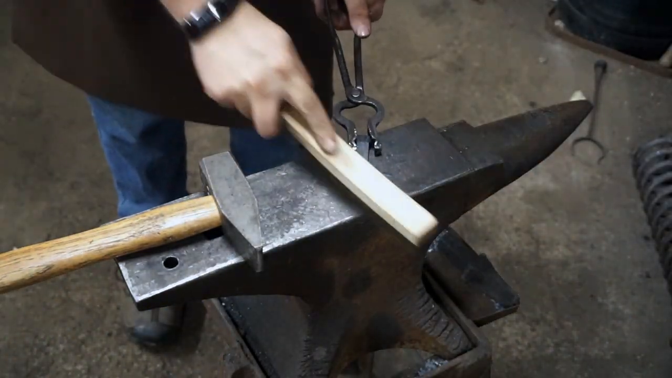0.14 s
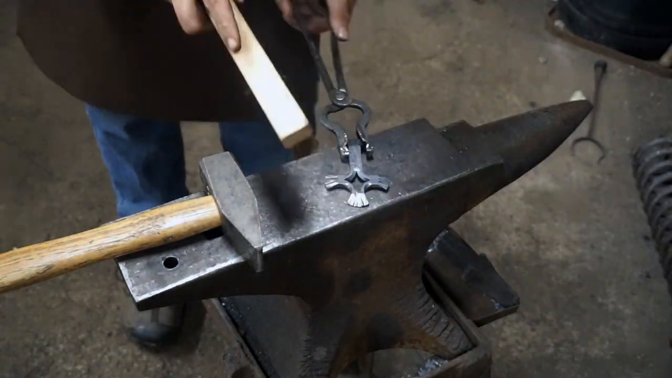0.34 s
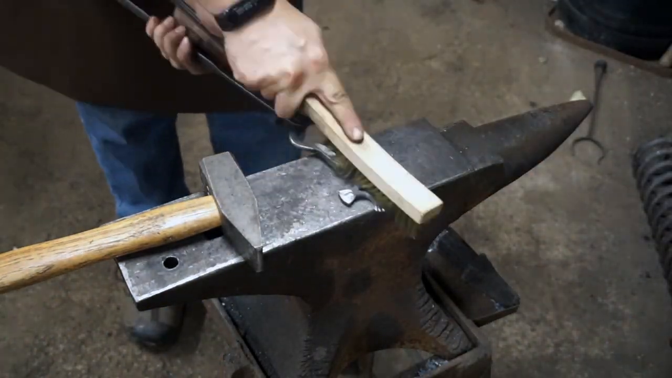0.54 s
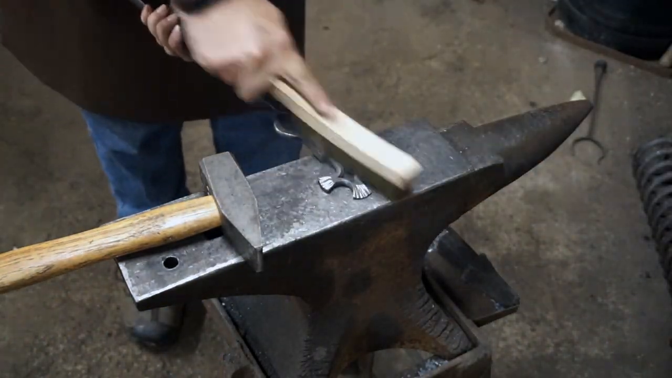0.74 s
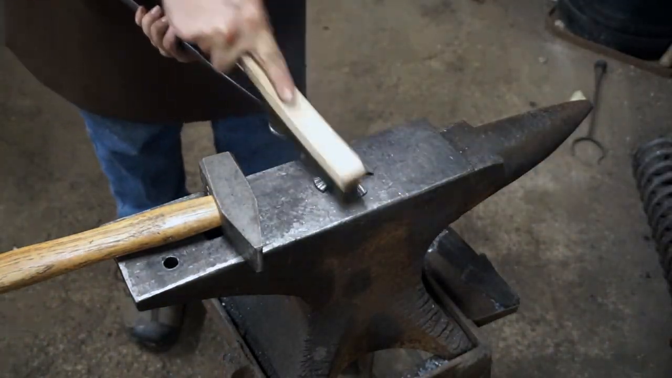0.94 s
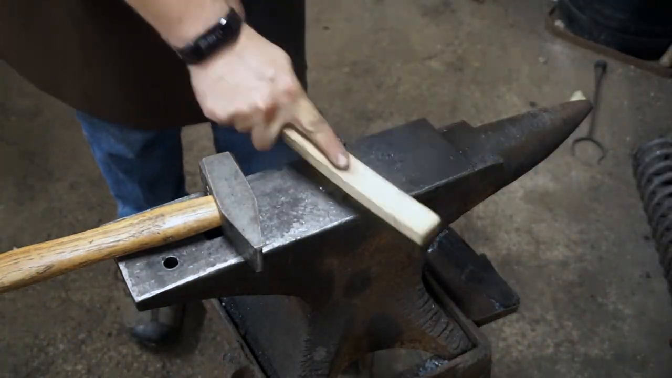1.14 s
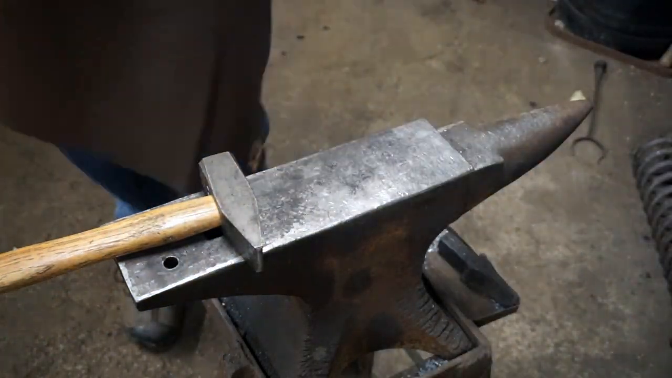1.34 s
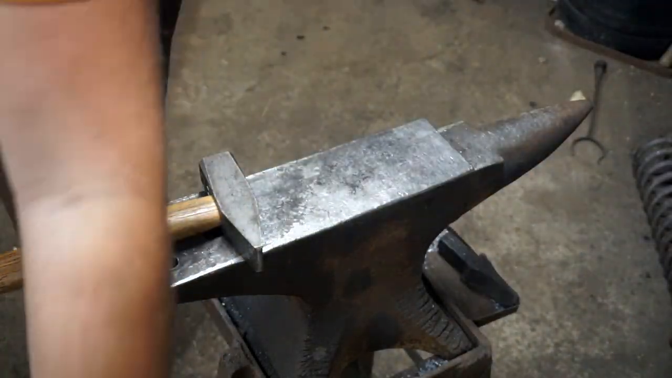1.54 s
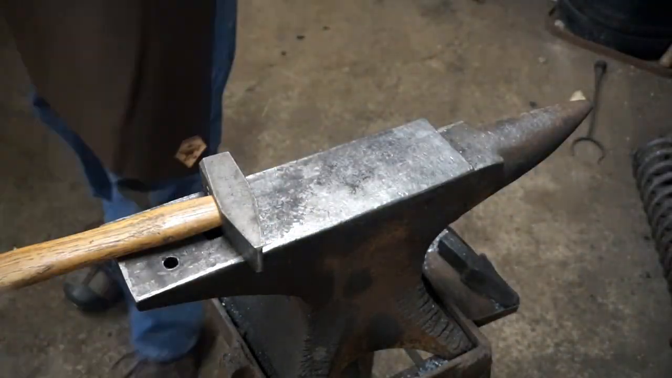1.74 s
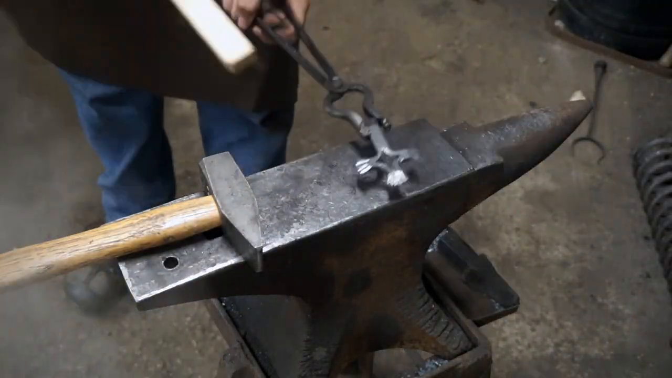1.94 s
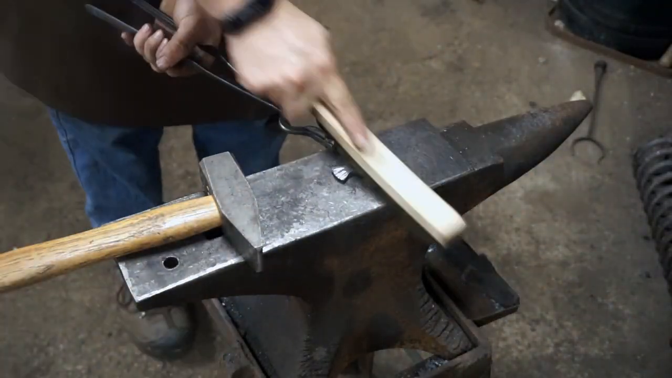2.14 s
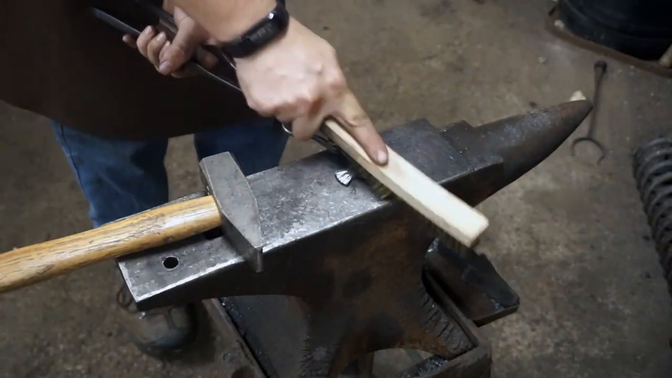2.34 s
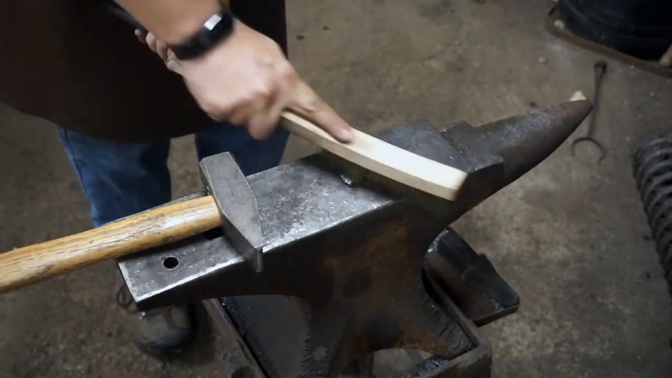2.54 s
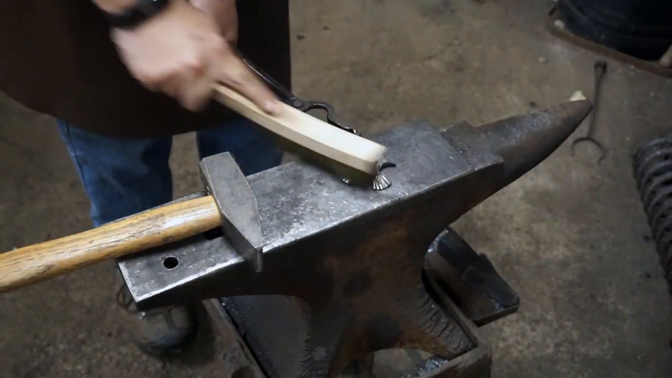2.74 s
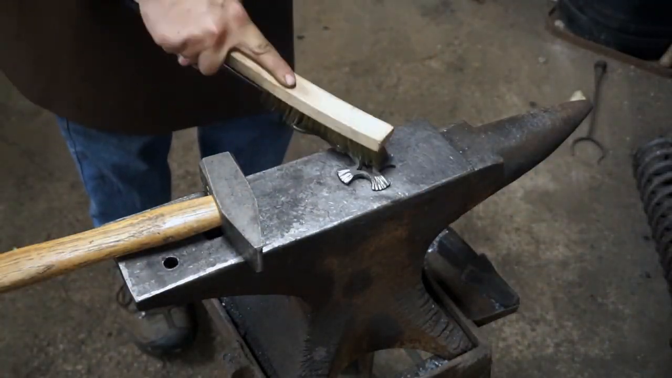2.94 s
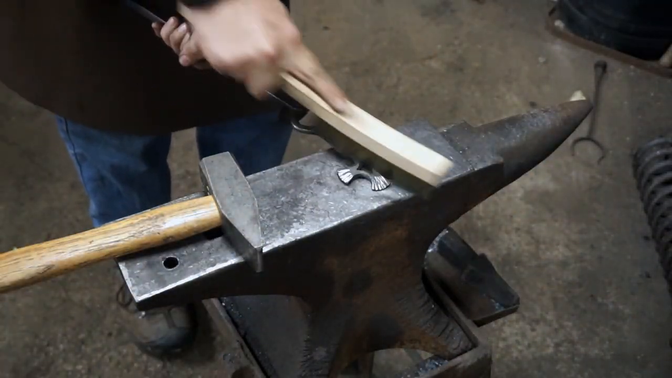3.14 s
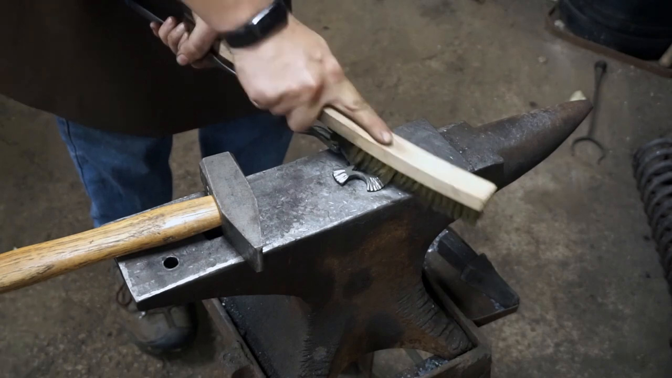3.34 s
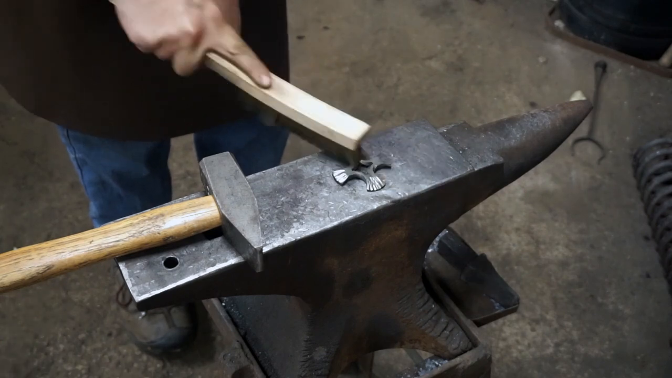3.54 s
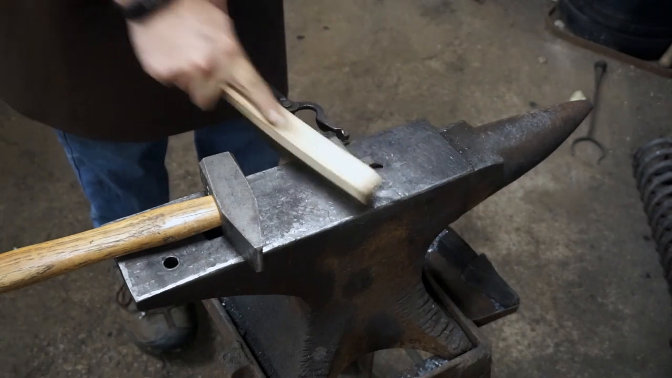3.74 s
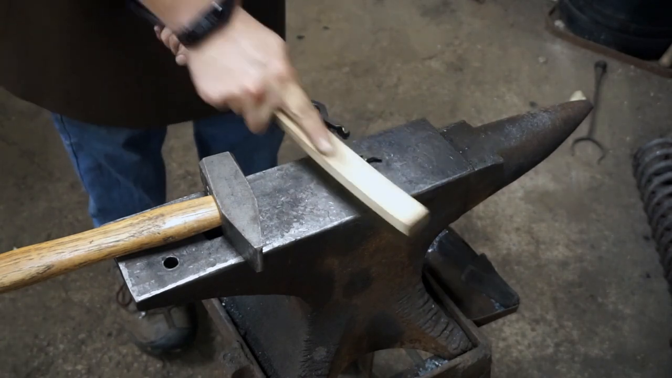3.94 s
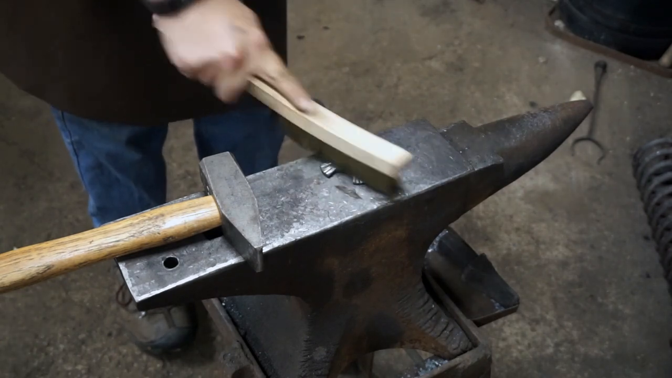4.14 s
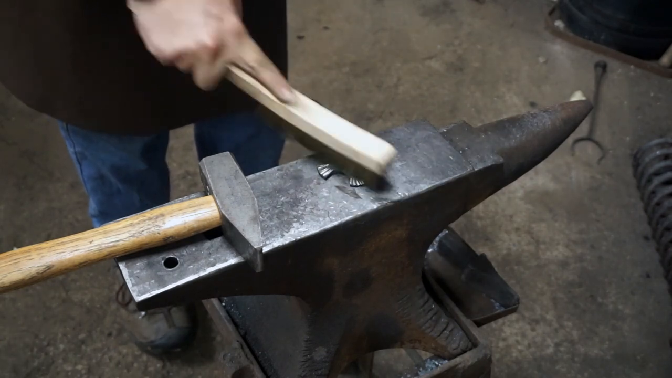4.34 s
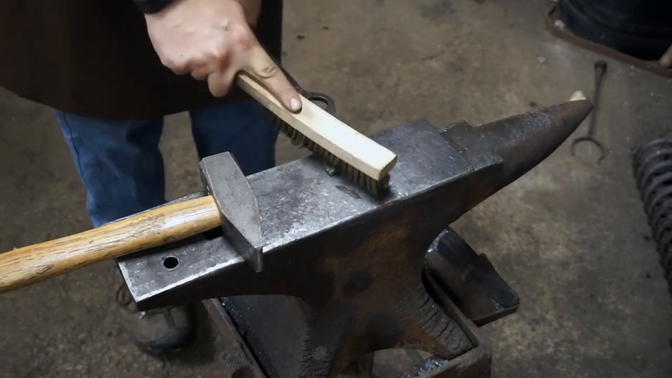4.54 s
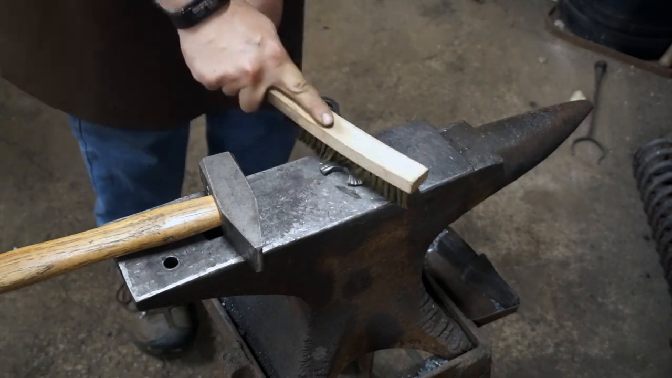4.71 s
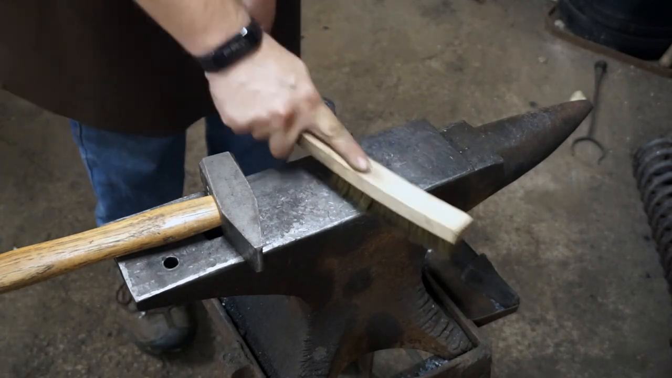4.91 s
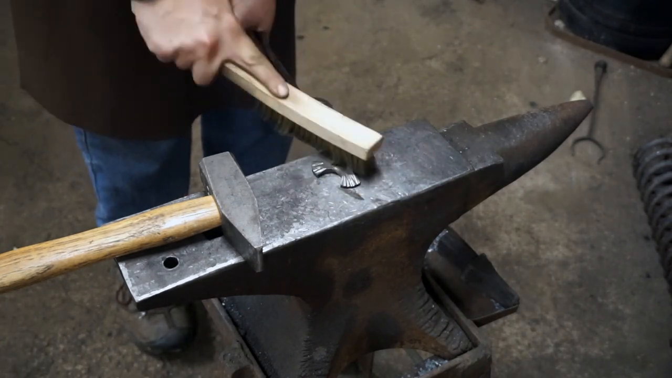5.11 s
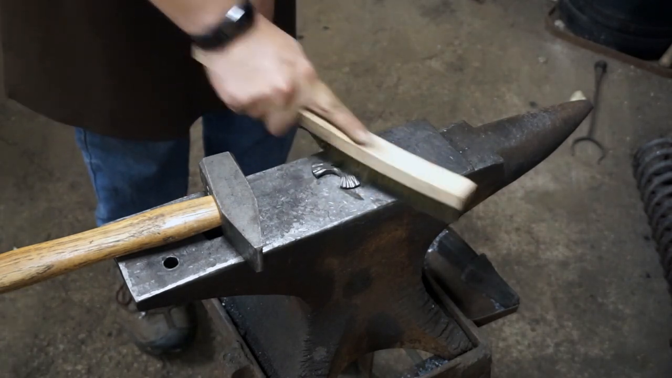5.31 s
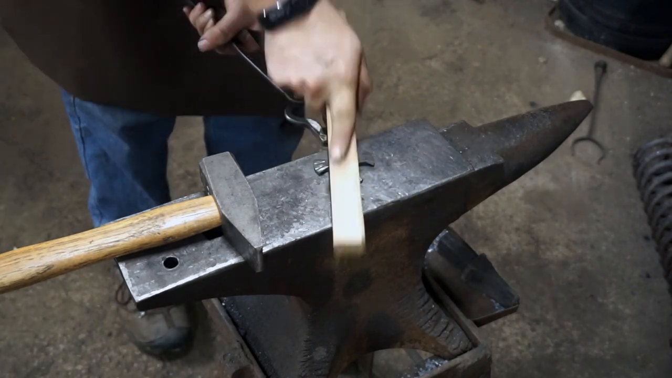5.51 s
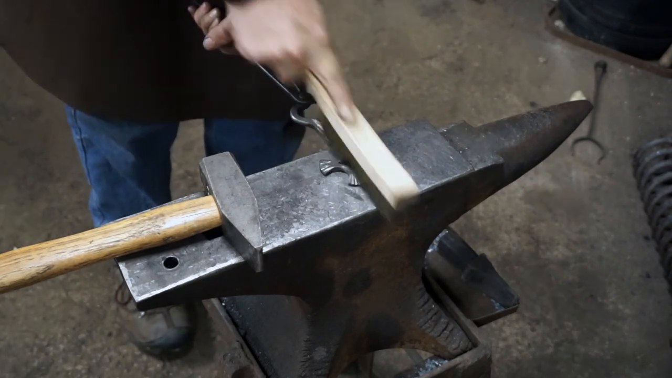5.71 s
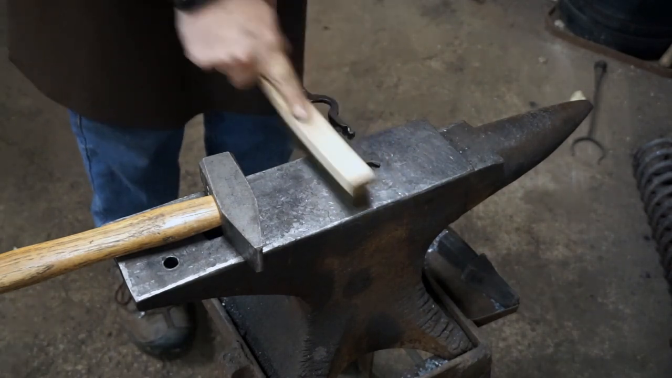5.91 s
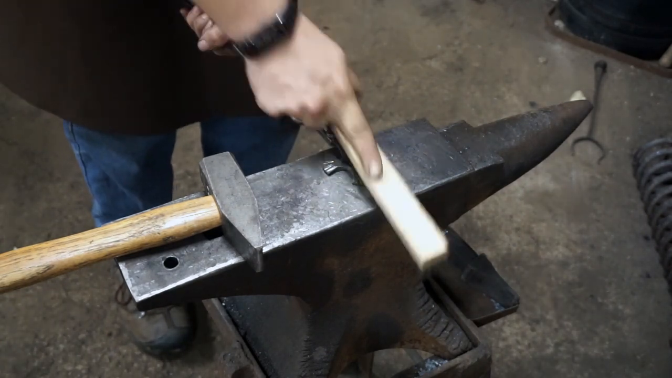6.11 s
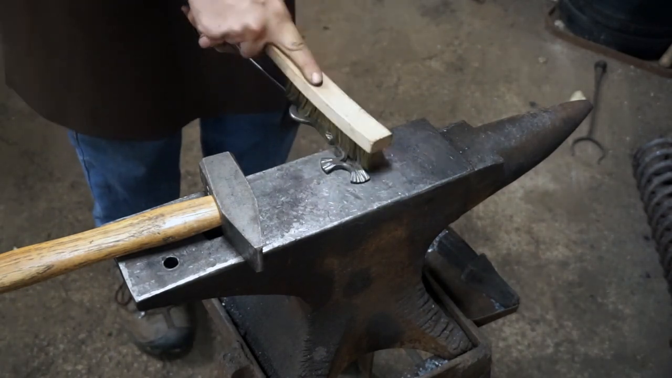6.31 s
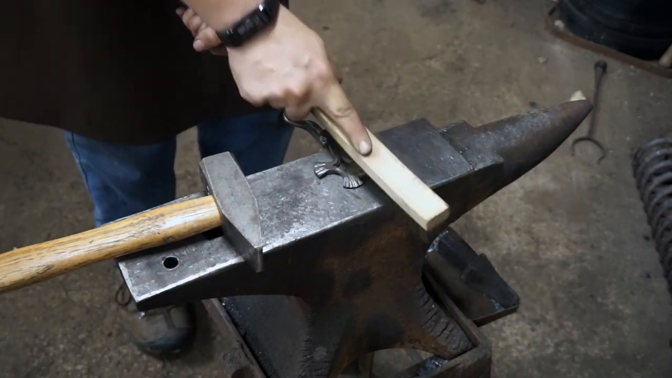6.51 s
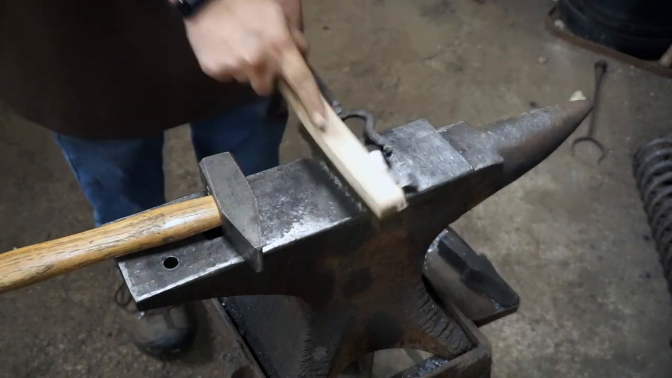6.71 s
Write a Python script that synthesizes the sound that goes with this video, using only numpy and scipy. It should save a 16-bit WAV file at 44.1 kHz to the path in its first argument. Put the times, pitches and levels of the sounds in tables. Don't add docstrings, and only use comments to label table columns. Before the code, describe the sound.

A close, thin stereo pickup in a forge with faint hiss and low roar. From 0 to 0.4 s a wire brush makes light, quick scratches on steel; a soft clink and slide follow. From 0.5 to 1.3 s it scrubs harder, a push and pull about every 0.09 s, bright and raspy with tiny wire snaps. After a slight cloth slide, hot metal hits water at 1.58 s: a sharp, loud spit of steam over rough bubbling, gone by 1.9 s. Tongs and piece clink around 2.05 s. Steady scrubbing runs 2.2 to 3.9 s, while a faint engine whine outside rises and stops near 3 s. Clinks and a slide at 3.95 s lead to a short bout until 4.6 s, more clinks, then brushing from 4.8 s to the end, with small dull knocks of the piece on the anvil.

```python
import sys
import numpy as np
from scipy import signal
from scipy.fft import rfft, irfft, next_fast_len
from scipy.io import wavfile
from scipy.ndimage import uniform_filter1d, map_coordinates

SR = 44100
rng = np.random.default_rng(int(sys.argv[2]) if len(sys.argv) > 2 else 0)


def master_out(mix):
    frames = np.transpose(np.atleast_2d(mix))
    ceiling = np.clip(frames, -1, 1)
    pcm = np.round(ceiling * 32767).astype(np.int16)
    wavfile.write(sys.argv[1], SR, pcm)


def volts(x):
    e = np.asarray(x, float) / 20
    return 10 ** e


N = 298157
TIME_S = np.arange(N) / SR

# frequency in Hz, level in dB per Hz.
HISS_SPECTRUM = [(530, -35), (900, -9), (2000, -1), (4500, -2.5), (9000, -8.5), (15700, -16)]
# time in seconds, level in dB.
ROAR_LEVEL = [(0, -80.5), (1.5, -76.5), (3, -77.5), (4, -82), (6.76, -84.5)]
# frequency in Hz, level in dB per Hz.
ROAR_SPECTRUM = [(120, -67), (200, -19), (270, -23), (318, -11.5), (411, -13), (546, -7.5), (598, -10.5),
                 (684, 0), (819, -10), (1200, 0), (1560, -14), (2640, -120)]
# time in seconds, frequency in Hz, level in dB.
ENGINE_HUM = [
    (0, 315, -96),
    (0.5, 322, -93),
    (1, 329, -96),
    (2, 341, -98),
    (2.7, 350, -101),
    (2.85, 355, -118),
]
# time in seconds, frequency in Hz, level in dB.
GEAR_WHINE = [
    (1.6, 532, -100),
    (1.75, 536, -93),
    (2.4, 553, -92),
    (2.95, 566, -84.5),
    (3.04, 566, -87),
    (3.08, 566, -112),
]
# frequency in Hz, t60 in seconds.
ROOM_T60 = [(500, 0.08), (3000, 0.14), (12000, 0.008)]
# frequency in Hz, side re mid in dB.
WIDE = [(60, 8), (150, 4.5), (380, -31.5), (950, -15), (2380, -8.5), (5980, -4.5), (15000, -7.5)]
# frequency in Hz, side re mid in dB.
COMPACT = [(150, -10), (450, -29), (1290, -14.5), (2600, -15.5), (4400, -7), (8000, -3), (15000, -7)]
# frequency in Hz, left re right in dB.
PORT_TILT = [(60, 2), (240, -1), (950, -0.5), (2600, -0.9), (4200, -2.5), (8000, -3.5), (15000, -5)]

# start in seconds, length in seconds, level in dB, roughness in dB.
SLIDES = [(0.364, 0.14, -62, -2.5), (0.384, 0.043, -63.5, 10.5), (1.3, 0.18, -59, -10.5),
          (1.49, 0.09, -61.5, 0), (1.938, 0.058, -57.5, -12), (1.99, 0.053, -54, -10),
          (2.037, 0.057, -52, -7), (2.118, 0.079, -53, -15), (3.925, 0.11, -48.5, -11.5),
          (3.953, 0.0072, -35, -7), (3.965, 0.13, -48, -16.5), (4.576, 0.066, -59, -2.5),
          (4.63, 0.13, -60, -12), (4.727, 0.15, -52.5, -17)]
# frequency in Hz, level in dB per Hz.
SLIDE_SPECTRUM = [(3500, -43.5), (5500, -10.5), (6500, -9), (9500, -2.5), (11500, -2.5), (15700, -6)]
# frequency in Hz, level in dB per Hz.
RUB_SPECTRUM = [(590, -65), (1000, -19.5), (2680, -6), (2910, -6.5), (4850, -3), (7000, -13.5),
                (9100, -41.5), (15400, -120)]

# time in seconds, vigour in dB, boil re steam in dB.
QUENCH_COURSE = [(1.563, -74, -6), (1.574, -32, -18), (1.585, -27, -10.5), (1.596, -25, -8),
                 (1.618, -35, -6), (1.634, -36, 2), (1.644, -29.5, -7.5), (1.658, -31.5, -8),
                 (1.68, -32.5, -12.5), (1.7, -38, -12), (1.768, -48, -10), (1.802, -47.5, -13),
                 (1.86, -58.5, -12), (1.94, -64, -11)]
# frequency in Hz, level in dB per Hz.
STEAM_SPECTRUM = [(2650, -44), (4500, -5), (10700, -4), (11700, -4), (15700, -3.5)]
# frequency in Hz, level in dB per Hz.
BOIL_SPECTRUM = [(300, -68), (560, -41), (1040, -15.5), (1600, -9), (1960, -5), (2350, -2), (4600, -5),
                 (5500, -22), (7500, -37)]
# start in seconds, frequency in Hz, peak in dB, t60 in seconds.
STEAM_BUBBLES = [(1.572, 1980, -40, 0.046), (1.584, 4690, -25.5, .05), (1.584, 2850, -27.5, 0.046),
                 (1.582, 14600, -20, 0.048), (1.590, 1960, -29.5, 0.097), (1.590, 5740, -26, .04),
                 (1.589, 7440, -35, .05), (1.590, 14300, -27, 0.032), (1.59, 4760, -33, .04),
                 (1.606, 2260, -30.5, .06), (1.614, 1050, -44, 0.08), (1.636, 4480, -37, 0.051),
                 (1.64, 12200, -30, 0.087), (1.651, 1976, -32, .08), (1.655, 7500, -33, 0.07),
                 (1.66, 8450, -36, .08), (1.694, 1320, -48, 0.039)]

# start in seconds, peak in dB, hardness in dB, ring in Hz.
TONG_CLINKS = [(0.4108, -48, -0.5, 2590), (1.947, -51.5, 9, 1890), (2.049, -47, 4, 2670),
               (3.9587, -34.5, 0, 2030), (4.175, -35, -3.5, 3230), (4.508, -45, 1, 2240),
               (4.565, -39, -5, 4160), (4.626, -58, 0, 4230), (4.7353, -39.5, -0.5, 3090),
               (6.737, -44.5, 6.5, 2480)]
# start in seconds, peak in dB, hardness in dB, ring in Hz.
PIECE_KNOCKS = [(2.0726, -35.5, 6, 1467), (3.9916, -44.5, 2, 2680), (4.6972, -42.5, 3, 2090),
                (5.2025, -40, -12, 2170), (5.2848, -39.5, -21, 2540), (5.521, -43.5, -6, 1910),
                (5.6025, -51, -7, 1510), (5.634, -51.5, -4, 3150), (5.37, -51.5, -6, 2010),
                (5.255, -51, -12, 2020), (5.671, -47.5, -9, 1880), (5.701, -38.5, 6.5, 3620),
                (6.0152, -49, -9, 2220), (6.03, -54.5, -14, 2040), (6.087, -48, -15, 2570),
                (6.2473, -41.5, -4, 2650), (6.321, -43, -15, 2570), (6.4044, -43, 0, 2010),
                (6.569, -50.5, -1, 2150), (6.649, -50.5, -6, 2060)]
# start in seconds, peak in dB, hardness in dB, ring in Hz.
DULL_BUMPS = [
    (0.4746, -62, 2, 4020),
    (1.501, -57.5, 12, 4130),
    (2.936, -55, 7, 700),
    (2.951, -64, -8, 363),
]
# crack in dB, tick in dB, thud in dB, ring in dB.
CONTACT_KINDS = [
    (2.5, 1, -24, -4.5),
    (-1.5, -1.5, -12.5, -6),
    (2, -24, 1.5, -6.5),
]
# frequency in Hz, level in dB per Hz.
RATTLE_SPECTRUM = [(880, -46.5), (1500, -11.5), (2760, -0.5), (3500, -4.5), (5500, -11.5), (7150, -42.5),
                   (12100, -120)]
# frequency in Hz, level in dB per Hz.
CRACK_SPECTRUM = [(3000, -37.5), (4800, -4), (6500, 1), (8800, -1.5), (11000, -25)]
# frequency in Hz, level in dB per Hz.
TICK_SPECTRUM = [(6500, -40.5), (9000, 5), (12500, 0.5), (15800, -1.5)]
# frequency in Hz, level in dB per Hz.
THUD_SPECTRUM = [(200, -50), (500, -22), (850, -8), (1150, 0), (1500, -3), (2400, -30)]
# start in seconds, frequency in Hz, peak in dB, t60 in seconds.
STEEL_PINGS = [(1.948, 6200, -47, 0.035), (1.952, 9200, -48, 0.094), (1.96, 6540, -55, .1),
               (2.012, 9850, -54, .15), (2.0463, 9070, -36, 0.091), (2.047, 14000, -31, 0.033),
               (2.051, 10040, -43.5, 0.16), (2.071, 6850, -37.5, 0.075), (2.0728, 8700, -38, .06),
               (2.0728, 4960, -40, .05), (2.075, 2180, -42.5, .07), (2.073, 994, -45.5, 0.036),
               (2.0735, 3630, -47, 0.033), (1.99, 2120, -68, 0.09), (4.173, 1290, -58, 0.036),
               (3.949, 6500, -40, .05), (3.9567, 9600, -30, 0.031), (3.9565, 12500, -29, 0.045),
               (3.957, 5480, -34, 0.035), (3.992, 9300, -37.5, .03), (3.992, 6400, -46, 0.026),
               (4.521, 2300, -50, 0.1), (4.523, 8700, -41, 0.056), (4.564, 12700, -44, 0.064),
               (4.577, 2530, -50, 0.025), (4.628, 12900, -48.5, .1), (4.693, 2220, -47.5, 0.054),
               (4.698, 12650, -43, .12), (4.72, 2150, -48, .04), (4.736, 6260, -47, .05),
               (5.205, 1270, -59, 0.042), (5.285, 2900, -46, 0.06), (5.2855, 2020, -42, 0.045),
               (5.522, 1230, -60, 0.05), (5.7, 1340, -51, 0.04), (5.701, 2060, -45, .04),
               (5.708, 2930, -47, 0.043), (6.075, 2040, -48, .02), (6.088, 2380, -52, .03),
               (6.248, 2000, -41.5, 0.025), (6.254, 3140, -46, 0.031), (6.247, 1260, -59, 0.045),
               (6.32, 2080, -44, 0.038), (6.321, 1330, -51, 0.04), (6.405, 2090, -51, 0.036)]

# start in seconds, peak in dB, t60 in seconds.
WIRE_SNAPS = [(0.0947, -36, 0.008), (0.145, -39, 0.008), (0.1999, -37, 0.008), (0.2513, -35, 0.008),
              (0.2993, -34, 0.008), (0.4893, -29, 0.008), (0.7759, -20, 0.0092), (0.857, -26, 0.008),
              (0.94, -30, 0.0086), (1.0243, -31, 0.008), (1.194, -30.5, 0.008), (1.583, -14, 0.0093),
              (1.5896, -13, 0.0072), (1.595, -20, 0.0092), (1.6395, -24, 0.008), (1.647, -20.5, 0.008),
              (2.0464, -32, 0.008), (2.4784, -31, 0.008), (2.7616, -30.5, 0.008), (2.855, -24.5, 0.008),
              (3.0415, -35, 0.008), (3.1258, -31, 0.0069), (3.1712, -35, 0.008), (3.217, -30, 0.008),
              (3.304, -24.5, 0.008), (3.3898, -28, 0.008), (3.5574, -33, 0.008), (3.5644, -28, 0.0071),
              (3.6476, -25, 0.0089), (3.8214, -33, 0.008), (3.9573, -21, 0.0066), (4.0919, -26, 0.0097),
              (4.173, -26, 0.008), (4.346, -28, 0.008), (4.428, -31, 0.008), (4.5655, -35, 0.008),
              (4.6277, -41, 0.009), (4.7356, -32, 0.008), (4.8758, -30, 0.0074), (5.127, -33, 0.008),
              (5.6327, -26.5, 0.008), (5.67, -26.5, 0.0088), (5.8619, -27, 0.0073), (5.9408, -25.5, 0.0087),
              (6.097, -28.5, 0.008), (6.1375, -27, 0.008), (6.1823, -29.5, 0.008), (6.2537, -26, 0.0068),
              (6.2879, -22, 0.008), (6.331, -34, 0.008), (6.4467, -27.5, 0.0094)]
# start in seconds, peak in dB.
DRY_SNAPS = [(1.5911, -10), (3.042, -30), (3.1275, -26), (3.2185, -29), (4.4285, -30), (5.6335, -25),
             (5.6702, -28), (5.8625, -26), (5.9405, -26), (6.2535, -25), (6.3315, -26)]
# frequency in Hz, level in dB per Hz.
SNAP_SPECTRUM = [(1500, -42.5), (3000, -15.5), (6500, -14), (9000, 2), (12500, 2), (15800, -1.5)]

# frequency in Hz, width in Hz, level in dB.
TUFTS = [
    (7414, 790, -3),
    (8490, 1100, -5),
    (8940, 570, -8),
    (10900, 6400, -0.5),
    (12700, 1500, 1.6),
    (15150, 1300, -6.5),
]
TUFT_LEANS = [0.4, 0.061, 1, 0.67, 1.3, -0.208]
# frequency in Hz, level in dB per Hz.
WIRE_BED_SPECTRUM = [(2350, -46.5), (4000, -26), (5570, -13.5), (9280, 5.5), (10900, 3.5), (13100, 2),
                     (16000, -5.5)]
# frequency in Hz, level in dB per Hz.
SCRAPE_SPECTRUM = [(290, -56), (500, -47), (546, -33), (597, -37.5), (689, -25), (1720, -15), (2030, -8.5),
                   (5550, -6.5), (7000, -2), (9100, -31.5), (15400, -120)]
# frequency in Hz, width in Hz, level in dB.
PIECE_MODES = [(7300, 300, -9), (9000, 48, -3), (9600, 84, -2.5), (11400, 130, -4.5), (13000, 1300, -2.5),
               (14000, 250, -5), (15100, 300, -6.5)]
# time in seconds, press in dB, brush tilt in dB, long wires in dB, middle wires in dB.
BRUSH_STANCE = [(0, -78, 7, -5, 2.5), (.12, -66, 1, -5, 3.5), (.36, -62.5, 3.5, -4.5, 4),
                (.5, -62.5, -1.5, -3, 2.5), (.9, -61, -0.5, -2.5, 1.5), (1.3, -65, -7, 0, 0.5),
                (2.18, -62, -0.5, -0.5, 0.5), (2.6, -66, -6, 0, 1.5), (3.1, -66, -3.5, -1.5, 2),
                (3.95, -62, -3.5, -2, 0.3), (4.6, -67, -5.5, 0.5, -0.5), (4.8, -63, -3.5, -1.5, -2),
                (5.4, -64, -2.5, 1.5, -2), (5.55, -65.5, 3.5, 0, -3.5), (6.2, -65, -1, 2, -1),
                (6.76, -63.5, -4, 2.5, 1)]
# start in seconds, bite in dB, push in dB, pull in dB.
OPENING_BOUT = [
    (-0.012, -66, -52.5, -54.5),
    (0.088, -51.5, -47, -50),
    (0.193, -53, -44.5, -47.5),
    (0.299, -49, -42.5, -64.5),
]
EARLY_BOUT = [(0.49, -48.5, -40.5, -45), (0.59, -42, -41, -48.5), (0.682, -40.5, -37.5, -43),
              (0.769, -41.5, -39.5, -43.5), (0.854, -37.5, -42.5, -43.5), (0.938, -40, -42, -46.5),
              (1.025, -38.5, -42.5, -41), (1.096, -42, -40.5, -45.5), (1.194, -39.5, -45.5, -66.5)]
LONG_BOUT = [(2.188, -55.5, -40, -44), (2.297, -41, -42, -42.5), (2.384, -41.5, -39.5, -44),
             (2.48, -38.5, -43, -47), (2.576, -39.5, -40, -44.5), (2.67, -39.5, -42, -41.5),
             (2.76, -37, -41, -40.5), (2.853, -36.5, -39.5, -42.5), (2.947, -37.5, -41.5, -44.5),
             (3.041, -36.5, -40, -42.5), (3.125, -37, -41, -42), (3.215, -38, -41, -41),
             (3.302, -40.5, -41, -42.5), (3.39, -37.5, -39, -44.5), (3.473, -38.5, -40.5, -44),
             (3.557, -39, -39.5, -44.5), (3.641, -39.5, -41, -43), (3.731, -41, -42.5, -44.5),
             (3.819, -40.5, -43, -42), (3.9, -41, -45, -77)]
SHORT_BOUT = [(4.009, -73, -76, -44.5), (4.092, -42.5, -41, -44), (4.169, -37, -39, -47.5),
              (4.261, -40, -39, -43), (4.346, -36, -41.5, -42.5), (4.431, -39.5, -43.5, -46),
              (4.517, -42, -39.5, -48.5)]
FINAL_BOUT = [(4.79, -66, -62, -45.5), (4.862, -38, -37.5, -46.5), (4.958, -46.5, -44.5, -46.5),
              (5.04, -44.5, -42.5, -45.5), (5.127, -40, -41.5, -45), (5.203, -41, -42, -44.5),
              (5.285, -46, -40.5, -46.5), (5.37, -43.5, -41.5, -46.5), (5.462, -48, -45, -46.5),
              (5.55, -42.5, -45, -44), (5.633, -40, -47.5, -42.5), (5.699, -57, -38.5, -47),
              (5.78, -43.5, -42, -43), (5.861, -40, -42, -43.5), (5.936, -43, -45.5, -43.5),
              (6.013, -42, -41, -45), (6.096, -41, -42, -44), (6.172, -40, -41, -43),
              (6.25, -36, -43.5, -40.5), (6.33, -38, -42.5, -40.5), (6.406, -45, -44, -39.5),
              (6.482, -40.5, -40.5, -42), (6.565, -42, -45, -45), (6.648, -44.5, -44, -45),
              (6.726, -42, -44, -51)]
# lift in seconds, turn dip in dB, push share of a stroke.
BOUT_LIFTS = [
    (0.44, -5.5, 0.49),
    (1.33, -2.5, 0.55),
    (3.985, -1, 0.54),
    (4.6, -2, 0.47),
    (6.84, -1.5, 0.56),
]


def unit(x):
    return x / np.sqrt(np.mean(x ** 2) + 1e-20)


def along(points, hz):
    f, v = np.transpose(points)
    return np.interp(np.log(hz + 1), np.log(f + 1), v)


def shaped(spectrum):
    return lambda hz: volts(along(spectrum, hz))


def resonance(hz, centre_hz, width_hz):
    damping = 1j * hz * width_hz
    return damping / (centre_hz ** 2 - hz ** 2 + damping)


def filtered(x, response):
    size = next_fast_len(N + 8192)
    return irfft(rfft(x, size) * response(np.fft.rfftfreq(size, 1 / SR)), size)[..., :N]


def gains(rows):
    s, *columns = np.transpose(rows)
    curves = [volts(np.interp(TIME_S, s, db, left=-150, right=-150)) for db in columns]
    return eased(curves)


def eased(curves):
    return uniform_filter1d(np.array(curves), size=65)


def flutter(rate_hz):
    knots = rng.standard_normal(int(N * rate_hz / SR) + 4)
    return map_coordinates(knots, [TIME_S * rate_hz])


def slips(spread_db):
    size_db = spread_db * np.minimum(rng.standard_exponential(N), 6.5)
    return rng.standard_normal((2, N)) * volts(size_db)


def spread(pair, response, width=WIDE):
    mid, side = filtered(pair, lambda hz: response(hz) * [np.ones_like(hz), volts(along(width, hz))])
    return np.array([mid + side, mid - side]) / np.sqrt(np.mean(mid ** 2))


def patchy(x, depth_db):
    z = signal.stft(x, nperseg=256)[2]
    field = uniform_filter1d(rng.standard_normal(z.shape[1:]), size=2, axis=0)
    field = uniform_filter1d(field, size=9, axis=1)
    gain = volts(depth_db * unit(field))
    return signal.istft(z * unit(gain), nperseg=256)[1][:, :N]


def tone(rows):
    s, hz, db = np.transpose(rows)
    phase = 2 * np.pi * np.cumsum(np.interp(TIME_S, s, hz) + 0.34 * flutter(6.2)) / SR
    level_db = np.interp(TIME_S, s, db, left=-150, right=-150) + 0.52 * flutter(3.3)
    return np.sqrt(2) * volts(level_db) * np.sin(phase)


def furnace():
    hiss_db = -68 - 2.0 * np.exp(-TIME_S / 0.33) + 3.0 * flutter(6.0)
    hiss = volts(hiss_db) * spread(slips(spread_db=-4.5), shaped(HISS_SPECTRUM))
    roar_gain = gains(ROAR_LEVEL)[0] * volts(-2.0 + 2.1 * flutter(6))
    roar = roar_gain * spread(slips(spread_db=-1.0), shaped(ROAR_SPECTRUM))
    return hiss + roar + tone(ENGINE_HUM) + tone(GEAR_WHINE)


def shop(x):
    hz, t, z = signal.stft(rng.standard_normal((2, SR // 3)), SR, nperseg=256)
    decay = volts(-60 * t / along(ROOM_T60, hz)[:, None])
    width = volts([0 * hz, along(WIDE, hz)])[..., None]
    mid, side = signal.istft(z * decay * width, SR, nperseg=256)[1]
    tail = np.array([mid + side, mid - side]) / np.linalg.norm(mid)
    return signal.fftconvolve(np.pad(x, (300, 0))[None], tail, axes=1)[:, :N]


def hands():
    hiss, rub = np.zeros((2, N))
    for s, length_s, db, rough_db in SLIDES:
        now = slice(round(s * SR), round((s + length_s) * SR))
        swell = volts(db) * np.abs(np.sin(np.pi * (TIME_S[now] - s) / length_s)) ** 0.4
        hiss[now] = np.hypot(hiss[now], swell)
        rub[now] = np.hypot(rub[now], volts(rough_db) * swell)
    smooth = hiss * spread(slips(spread_db=1.5), shaped(SLIDE_SPECTRUM))
    rough = rub * spread(slips(spread_db=4.0), shaped(RUB_SPECTRUM))
    return volts(2.0 * flutter(60)) * (smooth + rough)


def quench():
    steam, share = gains(QUENCH_COURSE)
    hiss = steam * spread(slips(spread_db=-1.5), shaped(STEAM_SPECTRUM), COMPACT)
    hiss = volts([[1.1], [-1.1]]) * hiss
    boil = steam * share * spread(slips(spread_db=-1.0), shaped(BOIL_SPECTRUM), COMPACT)
    return volts(1.0 * flutter(120)) * patchy(hiss + boil, depth_db=-0.5)


def clacks():
    colours = (RATTLE_SPECTRUM, CRACK_SPECTRUM, TICK_SPECTRUM, THUD_SPECTRUM)
    layers = np.array([spread(slips(spread_db=1.5), shaped(colour), COMPACT) for colour in colours])
    out, t = np.zeros((2, N + SR)), np.arange(SR // 5) / SR
    fall = 0.65 * volts(-60 * t / 0.15) + 0.24 * volts(-60 * t / 0.023) + 0.98 * volts(-60 * t / 0.006)
    attack = 1 - np.exp(-t / 0.00049)
    for rows, kind in zip((TONG_CLINKS, PIECE_KNOCKS, DULL_BUMPS), CONTACT_KINDS):
        crack_db, tick_db, thud_db, ring_db = kind
        for s, db, hard_db, hz in rows:
            now = (round(s * SR) + np.arange(len(t))) % N
            ring = volts(ring_db - 60 * t / 0.047) * np.sin(2 * np.pi * hz * t)
            mix_db = np.array([0, crack_db + hard_db, tick_db + hard_db, thud_db]) - 8.0
            noise = np.tensordot(volts(mix_db), layers[:, :, now], axes=1)
            out[:, now[0]:now[0] + len(t)] += volts(db) * (ring + fall * noise) * attack
    return out[:, :N]


def pings():
    out, t = np.zeros((2, N + SR)), np.arange(SR // 6) / SR
    rings = [*STEEL_PINGS, *STEAM_BUBBLES]
    luck = rng.standard_normal((len(rings), 2, 2, 7, 1))
    for (s, hz, db, t60_s), (detune, phase) in zip(rings, luck):
        partials = np.sin(2 * np.pi * hz * (1 + 0.045 * detune) * t + 3 * phase)
        mid, side = partials.sum(axis=1) * volts([[0], [along(COMPACT, hz) - 2]])
        envelope = volts(db - 9.0 - 60 * t / t60_s) * (1 - np.exp(-t / 0.00038))
        out[:, round(s * SR):][:, :len(t)] += envelope * np.array([mid + side, mid - side])
    return out[:, :N]


def snaps():
    burst, t = np.zeros(N + SR), TIME_S[:SR // 40]
    dry_t60_s = 0.004
    for s, db, t60_s in [*WIRE_SNAPS, *((s, db, dry_t60_s) for s, db in DRY_SNAPS)]:
        burst[round(s * SR):][:len(t)] += volts(db - 3.0 - 60 * t / t60_s)
    signs = np.sign(rng.standard_normal((2, N)))
    mid, side = filtered(burst[:N] * signs, shaped(SNAP_SPECTRUM))
    return np.array([mid + 0.63 * side, mid - 0.23 * side])


def strokes():
    pull_bite_db, turn_db, lifted_db = -0.2, -5.5, -76
    lead_in_s, lead_in_db = 0.0072, 3.5
    crest_share = 0.5
    starts, knots, levels = [], [], []
    bouts = (OPENING_BOUT, EARLY_BOUT, LONG_BOUT, SHORT_BOUT, FINAL_BOUT)
    for bout, (lift, dip_db, share) in zip(bouts, BOUT_LIFTS):
        s, bite, push, pull = np.transpose(bout)
        ends = np.append(s[1:], lift)
        turn = s + share * (ends - s)
        after = np.append(push[1:], lifted_db)
        far_dip = (push + pull) / 2 + turn_db + dip_db
        near_dip = (pull + after) / 2 + turn_db + dip_db
        pushes = (s, turn, [bite, push, far_dip])
        pulls = (turn, ends, [pull + pull_bite_db, pull, near_dip])
        for a, b, shape in (pushes, pulls):
            starts += list(a)
            times = [a + 0.0036, a + crest_share * (b - a), b - lead_in_s, b - 0.0008]
            knots += list(np.ravel(times))
            levels += list(np.ravel(shape + [shape[2] + lead_in_db]))
        knots.append(s[0] - 0.0008)
        levels.append(lifted_db)
    order = np.argsort(knots)
    return np.sort(starts), np.interp(TIME_S, np.array(knots)[order], np.array(levels)[order])


def wire_tufts(stroke, stroke_count, tilt, long_wires, middle_wires):
    luck_db = 1.1 * rng.standard_normal((stroke_count, len(TUFTS)))
    wires = volts(-2.5) * spread(slips(spread_db=-3.0), shaped(WIRE_BED_SPECTRUM))
    presence = (long_wires, 1, middle_wires, 1, 1, 1)
    for k, (hz, width_hz, db) in enumerate(TUFTS):
        tuft = spread(slips(spread_db=1.0), lambda f: resonance(f, hz, width_hz) ** 2)
        lean = tilt ** TUFT_LEANS[k] * presence[k]
        level_db = db - 7.5 + luck_db[stroke, k] + 0.67 * flutter(60)
        wires = wires + lean * volts(level_db) * tuft
    return wires


def piece_response(f):
    return 1 + sum(volts(db - 4.5) * resonance(f, hz, width_hz) for hz, width_hz, db in PIECE_MODES)


def brush():
    s, pressure_db = strokes()
    stroke = np.clip(np.searchsorted(s, TIME_S) - 1, 0, len(s) - 1)
    pressure_db = pressure_db + 1.2 * np.exp(-(TIME_S - s[stroke]) / 0.002)
    press, tilt, long_wires, middle_wires = gains(BRUSH_STANCE)
    wires = filtered(wire_tufts(stroke, len(s), tilt, long_wires, middle_wires), piece_response)
    wires = volts(pressure_db + 0.98 * flutter(180)) * unit(wires)
    scrape_gain = press * volts(4.0 + 1.2 * flutter(110)) * volts(0.86 * (pressure_db + 46.0))
    scrape = scrape_gain * spread(slips(spread_db=3.0), shaped(SCRAPE_SPECTRUM))
    return patchy(wires + scrape, depth_db=1.8)


def scene():
    near = brush() + clacks() + snaps() + pings()
    return near + volts(-14.5) * shop(near.mean(0)) + quench() + hands() + furnace()


def roll_off(x):
    return signal.sosfilt(signal.butter(12, 16980, fs=SR, output="sos"), x)


def record(dry):
    top_hz, bass_hz, lead_s = 15740, 250, 1.0e-5

    def ports(hz):
        band = (hz < top_hz) / (1 + (bass_hz / (hz + 1)) ** 6)
        tilt = volts(along(PORT_TILT, hz) * np.array([[0.5], [-0.5]]))
        lead = np.exp(1j * np.pi * hz * lead_s * np.array([[1], [-1]]))
        return band * tilt * lead

    fade_out = np.clip((N / SR - TIME_S) / 0.002, 0, 1)
    return roll_off(filtered(dry, ports) * fade_out)


dry = scene()
out = record(dry)
master_out(out)
```